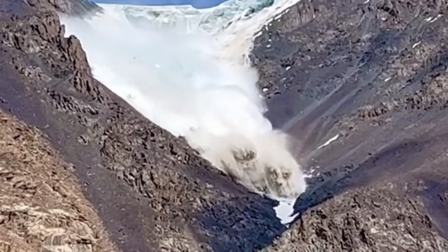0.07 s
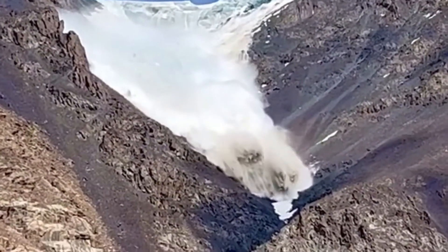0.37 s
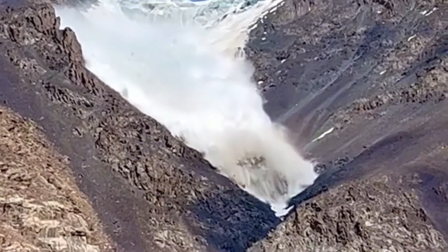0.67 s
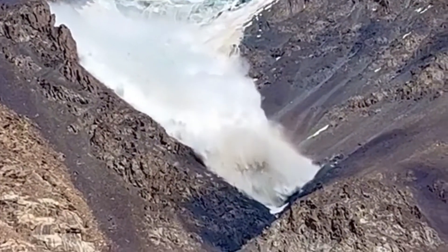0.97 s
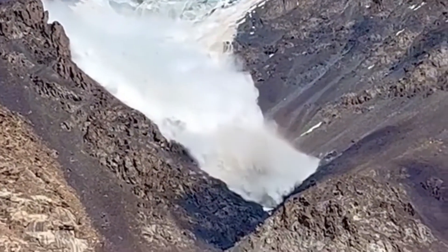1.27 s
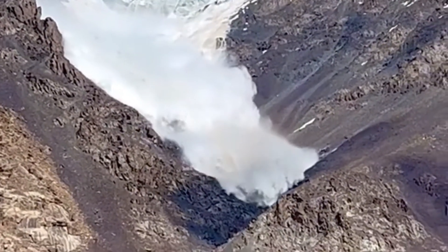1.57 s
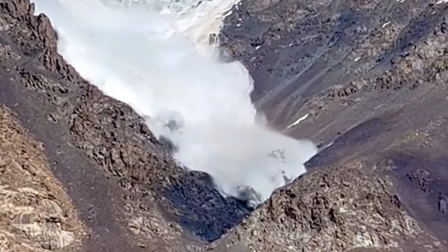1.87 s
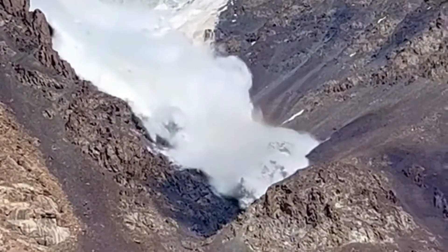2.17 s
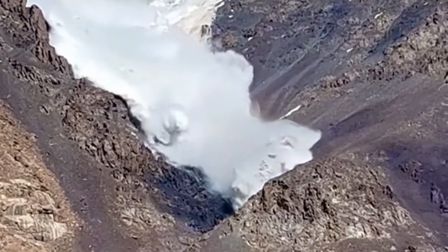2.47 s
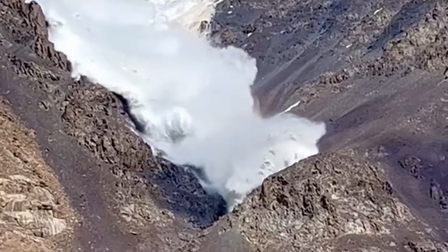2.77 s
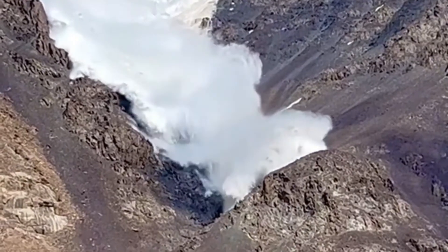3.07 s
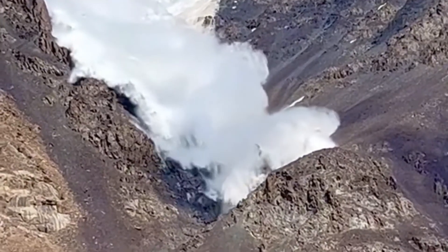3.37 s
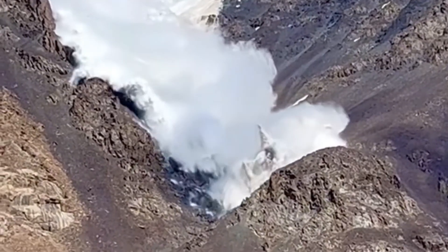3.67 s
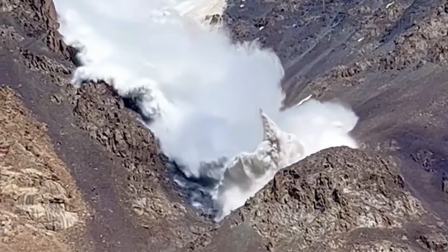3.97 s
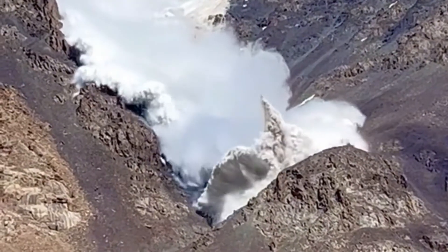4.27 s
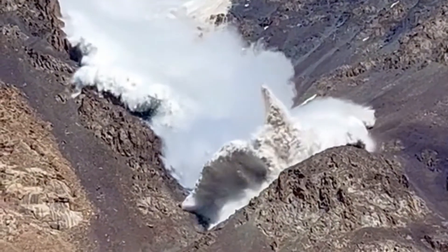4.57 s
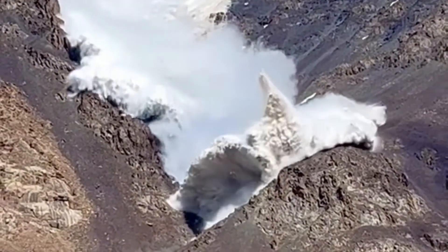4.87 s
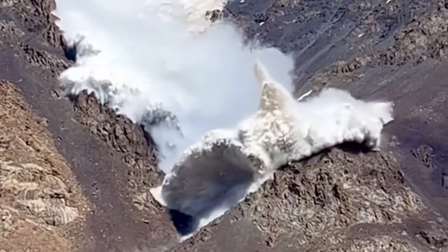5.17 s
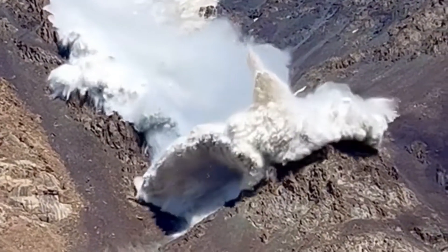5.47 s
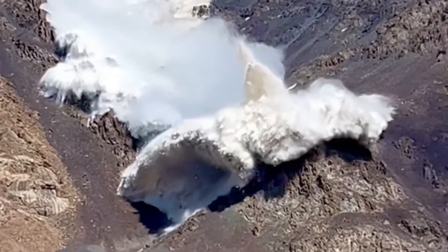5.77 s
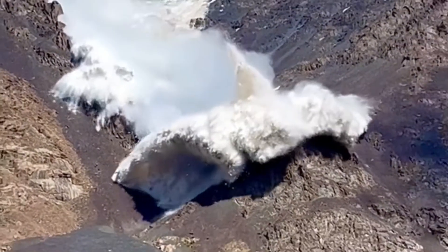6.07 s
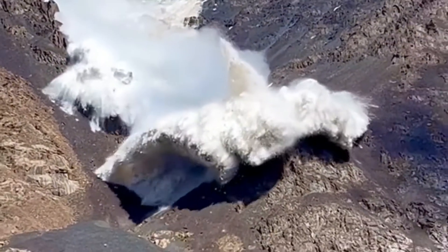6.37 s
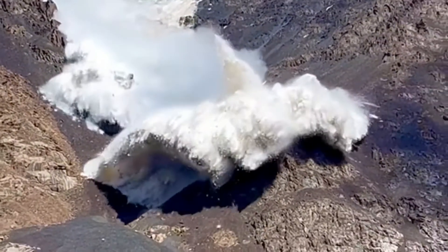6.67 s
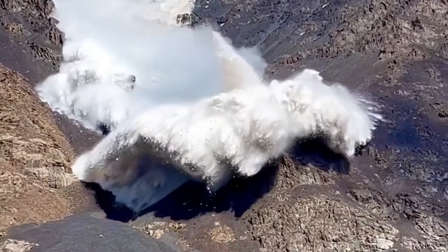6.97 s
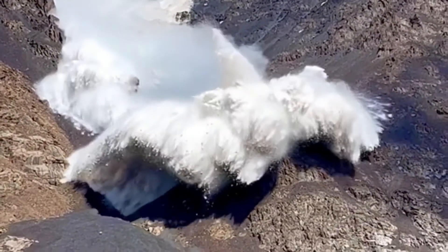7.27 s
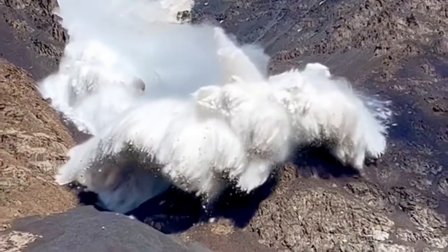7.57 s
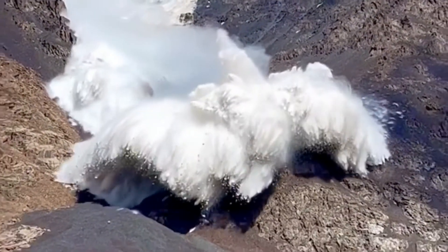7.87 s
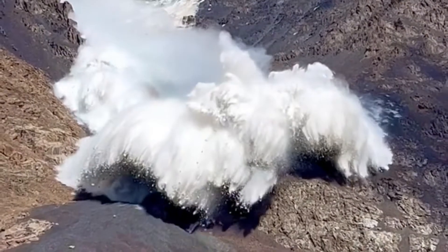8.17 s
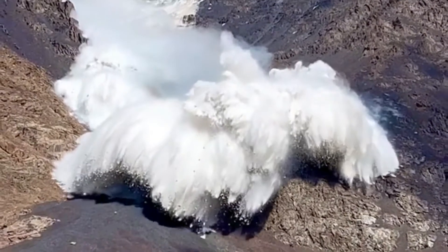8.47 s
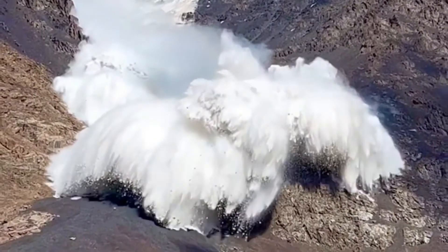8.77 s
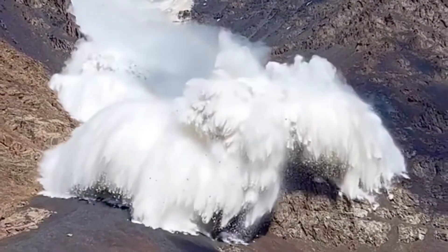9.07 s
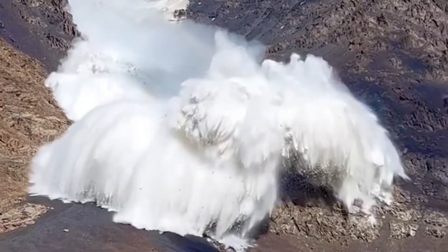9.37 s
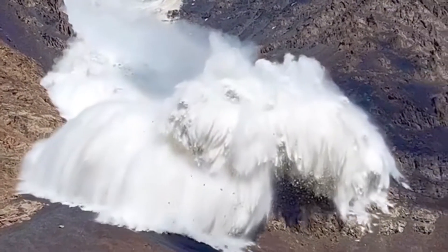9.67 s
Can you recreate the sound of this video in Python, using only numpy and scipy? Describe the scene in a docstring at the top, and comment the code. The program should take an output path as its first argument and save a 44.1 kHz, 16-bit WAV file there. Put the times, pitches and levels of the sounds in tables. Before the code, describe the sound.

A distant avalanche gives a dull roar and deep, swelling rumble with muffled knocks of ice, while wind gusts thump the microphone.

```python
"""In a mountain valley, a large avalanche pours down a rocky gully on the far side.
The churning snow gives a dull roar over a deep, surging rumble. Both swell as the front bursts
out of the gully, and blocks of ice land with dull knocks and booms. Gusts of wind flutter and
thump on the microphone. Close by there are a gritty rustle, two faint ticks and brief swishes.
A faint hiss lies under it all, and a narrow band of high hiss comes in once, briefly."""
import sys
import numpy as np
from scipy import signal
from scipy.fft import rfft, irfft, next_fast_len
from scipy.io import wavfile
from scipy.ndimage import uniform_filter1d

SR = 44100
rng = np.random.default_rng(int(sys.argv[2]) if len(sys.argv) > 2 else 0)


def log_audio(samples):
    """Write samples as a 16-bit WAV file to the path given in sys.argv[1]."""
    # one column per channel
    frames = np.atleast_2d(samples).T
    # limit to full scale, then quantise
    limited = np.clip(frames, -1, 1)
    pcm = np.round(limited * 32767).astype(np.int16)
    wavfile.write(sys.argv[1], SR, pcm)


N = 437913
TIME = np.arange(N) / SR
SIZE = next_fast_len(N, real=True)
HZ = np.maximum(np.arange(SIZE // 2 + 1) * SR / SIZE, 1)   # the frequencies of a spectrum
SIDES = np.array([[1], [-1]])   # left, right


# How hard the snow is flowing, as a boost in loudness: t/s, level/dB
FLOW_STRENGTH = [(0, 1), (2.2, 1), (3.4, 1.8), (4.2, 4), (4.95, 7), (5.8, 6), (6.5, 4), (7.1, 5.5),
                 (7.6, 4.5), (8.7, 7), (9.65, 8.5), (9.93, 8)]
# The tone of the roar, from low to high: f/Hz, level/dB
ROAR_TONE = [(110, -28), (180, 2), (242, -5), (475, -8.5), (711, -11), (869, -15.5), (1000, -15.5),
             (1920, -30.5), (2520, -39), (3050, -45.5), (3960, -75.5), (6710, -120)]

def roar(low_hz=250, split_hz=1600, roar_db=-46, lumpy_db=0.97, rush_db=-64, rush_follows=0.019):
    """Countless collisions blur into a lumpy roar; above it lies a dull, nearly steady rush."""
    flow_db, = in_time(FLOW_STRENGTH)
    tone = colour(ROAR_TONE)
    body = from_db(roar_db + flow_db + lumpy_db * drift(14)) * far_noise(tone * band(low_hz, split_hz))
    rush_level = from_db(rush_db + rush_follows * flow_db + .5 * drift(25))
    return body + rush_level * far_noise(tone * band(split_hz, 4900))


# How loud the deepest rumble is: t/s, level/dB
DEEP_LEVEL = [(0, -44.5), (0.6, -39), (1.2, -41.5), (1.9, -47), (2.4, -41.5), (3.3, -43.5), (3.9, -42),
              (4.7, -37), (5.4, -37.5), (6.0, -40.5), (6.5, -38), (7.2, -35), (7.6, -40), (8.2, -35.5),
              (8.9, -36), (9.4, -35.5), (9.93, -42)]
# The tones of the whole moving mass and of its tumbling blocks: f/Hz, level/dB
DEEP_TONE = [(14, -31), (22, -14), (30, -9), (40, -2.5), (48, -1.5), (54, 2.5), (62, 0), (75, -5.5),
             (130, -4), (170, -38)]
CHURN_TONE = [(32, -31), (55, 3.5), (80, -.5), (115, -4.5), (160, -7), (230, -10), (400, -16), (520, -42.5),
              (880, -120)]

def rumble(split_hz=75, top_hz=250, churn_db=-45, follows=0.82, surge_db=0.8, nearing_db_per_s=0.5275):
    """The mass of snow shakes the air lowest of all; tumbling blocks churn just above it."""
    deep_db, = in_time(DEEP_LEVEL)
    flow_db, = in_time(FLOW_STRENGTH)
    nearing_db = nearing_db_per_s * TIME   # the churn grows as the front draws nearer
    churn_level = from_db(churn_db + follows * flow_db + nearing_db + surge_db * drift(25))
    deep = steadied(far_noise(colour(DEEP_TONE) * band(31, split_hz)), span_s=0.3, share=0.3)
    churn = steadied(far_noise(colour(CHURN_TONE) * band(split_hz, top_hz)), span_s=0.14, share=0.29)
    return from_db(deep_db) * deep + churn_level * churn


def knocks(per_s=9, knock_db=-55, follows=0.84, size_db=3, length_s=.014, low_hz=90, high_hz=560):
    """Larger blocks of ice land at random, each with a dull knock that distance smears."""
    flow_db, = in_time(FLOW_STRENGTH)
    sizes = from_db(size_db * np.minimum(rng.exponential(1, N), 2))
    hits = sizes * (rng.random(N) < per_s / SR)
    age = TIME[:SR // 4] / length_s
    envelope = rms_one(signal.fftconvolve(hits, age * np.exp(-age))[:N])
    noise = far_noise(colour(ROAR_TONE) * band(low_hz, high_hz, order=4))
    return from_db(knock_db + follows * flow_db) * envelope * noise


# The biggest blocks of ice landing: t/s, level/dB, f/Hz, fade time/s
BIG_BLOCKS = [(2.821, -42, 420, .02), (4.886, -32, 225, 0.042), (4.935, -37, 340, 0.039),
              (4.975, -37, 486, 0.02), (5.105, -34, 199, 0.014), (5.109, -38, 460, 0.054),
              (5.193, -36, 199, 0.054), (5.29, -36, 191, 0.043), (5.718, -39.5, 304, 0.013),
              (5.981, -33, 190, 0.018), (6.302, -37, 428, 0.016), (6.478, -29, 158, 0.01),
              (7.43, -31, 298, 0.0077), (7.911, -37, 214, 0.012), (8.38, -40.5, 304, 0.012),
              (9.036, -33, 272, 0.02), (9.278, -38, 200, 0.014), (9.42, -43, 496, 0.055),
              (9.579, -34, 295, 0.022), (9.672, -35, 300, 0.0095), (9.715, -36.5, 473, 0.06),
              (9.871, -41, 470, 0.074)]

def booms(band_ratio=1.12, attack_s=0.0028, air_cutoff_hz=1100):
    """Each big block lands with a boom, lower for a heavier one, that dies away among the slopes."""
    out = np.zeros((2, N))
    age = TIME[:SR // 3]
    for s, db, hz, fade_s in BIG_BLOCKS:
        around_pitch = signal.butter(2, [hz / band_ratio, hz * band_ratio], "band", fs=SR, output="sos")
        noise = signal.sosfilt(around_pitch, rng.standard_normal(len(age)))
        envelope = (1 - np.exp(-age / attack_s)) * np.exp(-age / fade_s)
        noise /= np.sqrt(np.average(noise ** 2, weights=envelope ** 2))
        boom = from_db(db) * noise * envelope / envelope.max()
        at = round(s * SR)
        out[:, at:at + len(boom)] += boom[:N - at]
    return muffled(out, air_cutoff_hz, order=6)


# Gusts of wind, each timed from when it reaches full strength: t/s, hold/s, level/dB
WIND_GUSTS = [(0.0, 0.58, -40), (2.1, 0.88, -53.5), (3.35, 0.18, -48.5), (3.62, 0.037, -49.5),
              (4.1, 0.28, -40), (4.48, 0.24, -41), (5.08, 0.044, -42), (5.28, 1.55, -39),
              (7.0, 0.022, -37.5), (7.32, 0.11, -44), (8.5, .35, -59), (8.98, 0.26, -42.5),
              (9.3, 0.71, -35.5)]

def gust_level(rise_db_per_s=96.5, fall_db_per_s=87.5, breeze_db=-71.5):
    """How strong the wind is, in dB: the strongest gust of the moment, or else a light breeze."""
    gusts = [db + held_db(s, hold_s, rise_db_per_s, fall_db_per_s) for s, hold_s, db in WIND_GUSTS]
    return np.maximum(breeze_db, np.max(gusts, axis=0))


# The tone of wind on the microphone: f/Hz, level/dB
WIND_TONE = [(12, -44), (20, -15), (59, 1), (177, 1.5), (290, -7.5), (363, -8.5), (491, -11), (634, -15),
             (792, -18), (900, -24), (1170, -52), (1980, -120)]

def wind(split_hz=330, strong_db=-37, bright_db=0.5, flutter_db=0.5, trim_db=-1, facing_db=1.5):
    """Swirls of air push the microphone's two openings opposite ways; the right one faces the wind."""
    level_db = gust_level() + trim_db + flutter_db * drift(23)
    swirls = white_spectrum() * colour(WIND_TONE)
    large = to_sound(swirls * band(13, split_hz))
    small = to_sound(swirls * band(split_hz, 750))
    # Stronger gusts shed more small swirls, so they sound brighter.
    small_db = bright_db + 0.44 * np.minimum(level_db - strong_db, 3)
    openings = SIDES * from_db(-facing_db * SIDES)
    return from_db(level_db) * (large + from_db(small_db) * small) / np.std(large) * openings


def wind_rumble(shared_db=-9, low_hz=60, top_hz=170):
    """The largest swirls of each gust reach both openings alike."""
    swirls = white_spectrum() * colour(WIND_TONE) * band(low_hz, top_hz, order=3)
    return from_db(gust_level() + shared_db) * rms_one(to_sound(swirls))


# Thumps of wind: t/s, thump level/dB, thump f/Hz, puff level/dB, spread in time/s
THUMPS = [(0.04, -35, 151, -37, 0.015), (0.109, -35, 120, -44, 0.019), (0.209, -30, 80.6, -38.5, 0.015),
          (0.336, -28.5, 61.6, -41.5, 0.019), (0.396, -27.5, 93, -41, 0.013), (0.5, -35, 70, -35, 0.013),
          (0.594, -30.5, 58, -44, 0.024), (1.63, -35, 53.3, -54, 0.045), (2.041, -36, 117, -44, 0.011),
          (2.309, -35, 61, -49, 0.011), (4.009, -25, 57, -38, 0.011), (4.288, -26, 60, -36, 0.023),
          (4.34, -30, 72, -35.5, 0.012), (5.298, -29, 56, -40, 0.015), (5.421, -26.5, 52, -44, 0.014),
          (5.564, -23.5, 59.6, -44.5, 0.012), (6.627, -23, 54, -31, 0.014), (7.108, -26.5, 80, -40, 0.0054),
          (7.139, -25, 70, -52, 0.0077), (7.196, -20, 58, -38.5, 0.0072), (7.269, -24.5, 85.4, -37, 0.0059),
          (7.312, -24.5, 97, -43, 0.0099), (7.358, -23, 61.7, -42, 0.01), (7.371, -18.5, 114, -38, 0.0074),
          (7.405, -26, 62, -39, 0.015), (7.447, -13, 50, -25.5, 0.017), (7.638, -27.5, 52, -44, 0.027),
          (8.078, -25.5, 82, -40, 0.011), (8.511, -23, 70, -46, 0.0066), (8.674, -24, 54, -38, 0.013),
          (8.771, -18.5, 68.5, -34, 0.0062), (8.826, -24, 70.7, -35, 0.0062),
          (8.918, -23, 79, -40.5, 0.014), (8.988, -26, 62, -48, 0.016), (9.2, -26, 82, -44, 0.024),
          (9.406, -22.5, 110, -37, 0.0064), (9.478, -29, 134, -43.5, 0.01), (9.555, -27, 96, -42.5, 0.013),
          (9.621, -21, 109, -41, 0.0058), (9.699, -22, 96, -38, 0.0086)]

def wind_thumps(puff_low_hz=80, puff_high_hz=210):
    """A big swirl covers both openings at once: a few slow waves of pressure and a dull puff."""
    puff = steadied(far_noise(band(puff_low_hz, puff_high_hz, order=3)), span_s=0.0058, share=0.47)
    out = np.zeros((2, N))
    for s, thump_db, hz, puff_db, spread_s in THUMPS:
        suction = -from_db(thump_db) * np.cos(2 * np.pi * hz * (TIME - s))
        out += swell(s, spread_s) * (suction + from_db(puff_db) * puff)
    return out


# How loud the gritty rustle is: t/s, level/dB
GRIT_LEVEL = [(0, -88), (0.7, -91), (2.9, -89), (3.5, -88), (5.0, -83.5), (5.7, -88), (7.15, -88.5),
              (7.7, -91.5), (8.5, -87.5), (9.1, -94.5), (9.93, -96)]

def grit(per_s=1500, size_db=2.5, ring_cycles=45, low_hz=2700, high_hz=4100, db_per_octave=-16):
    """A stream of tiny grains makes a faint rustle, each ringing briefly at one of many pitches."""
    level_db, = in_time(GRIT_LEVEL)
    hits = rng.random(N) < per_s / SR
    sizes = from_db(size_db * np.minimum(rng.exponential(1, N), 3))
    grains = hits * sizes * rng.choice([-1, 1], N)
    pitches = np.geomspace(low_hz, high_hz, 24)
    chosen_pitch = rng.integers(0, len(pitches), N)
    out = np.zeros(N)
    for k, hz in enumerate(pitches):
        fade, turn = from_db(-60 * hz / (ring_cycles * SR)), 2 * np.pi * hz / SR   # per sample
        ringer = [np.sin(turn), 0, -np.sin(turn)], [1, -2 * fade * np.cos(turn), fade ** 2]
        ring = signal.lfilter(*ringer, grains * (chosen_pitch == k) + 1e-18)
        out += from_db(db_per_octave * np.log2(hz / low_hz)) * ring
    return from_db(level_db) * rms_one(muffled(out, high_hz, order=8))


# Small taps nearby: t/s, ring level/dB, treble limit f/Hz, scuff level/dB
TAPS = [(2.239, -48.5, 3600, -71), (8.492, -56, 3500, -76)]
# The notes that ring in each tap: f/Hz, level/dB, time to die away/s
TAP_NOTES = [(1260, -2, .02), (1600, 4.5, 0.029), (1860, 3, .014), (2540, -5, 0.01), (3000, -14, 0.028),
             (3770, -11, .016)]

def ticks(scuff_s=.009, scuff_low_hz=1400, scuff_high_hz=3900, rough_db=3):
    """Small, blunt taps ring for an instant inside a rough scuff; a softer touch sounds duller."""
    age = TIME[:SR // 20]
    ring = sum(from_db(db - 60 * age / fade_s) * np.sin(2 * np.pi * hz * age)
               for hz, db, fade_s in TAP_NOTES)
    roughness = from_db(rough_db * drift(130))
    scuff = rms_one(roughness * to_sound(white_spectrum() * band(scuff_low_hz, scuff_high_hz, order=12)))
    out = np.zeros(N)
    for s, db, top_hz, scuff_db in TAPS:
        at = round(s * SR)
        out[at:at + len(ring)] += from_db(db) * muffled(ring, top_hz, order=12)
        out += from_db(scuff_db) * swell(s, scuff_s) * scuff
    return out


# Swishes nearby, each timed from when it reaches full strength: t/s, level/dB, hold/s
SWISH_STROKES = [(7.364, -79.5, 0.001), (9.143, -62, 0.027), (9.19, -80, 0.028), (9.294, -84, .012)]
# The tone of a swish: f/Hz, level/dB
SWISH_TONE = [(1800, -16), (3300, 4), (4500, -1), (5700, -6.5), (7000, -3), (8200, -11), (9000, -25),
              (12000, -48)]

def swishes(rough_db=1.5, rise_db_per_s=1098, fall_db_per_s=852):
    """Short, rasping swishes close by: each catches quickly, slides and lets go."""
    strokes = [db + held_db(s, hold_s, rise_db_per_s, fall_db_per_s) for s, db, hold_s in SWISH_STROKES]
    level_db = np.maximum(np.max(strokes, axis=0), -200) + rough_db * drift(200)
    return from_db(level_db) * wide_noise(colour(SWISH_TONE), width=.7)


def narrow_hiss(at_s=8.165, hold_s=.155, hz=5020, spread_hz=120, level_db=-91):
    """A very faint, narrow band of high hiss near 5 kHz comes in, holds briefly and stops."""
    noise = wide_noise(band(hz - spread_hz, hz + spread_hz, order=40), width=0.64)
    return from_db(level_db + held_db(at_s, hold_s, rise_db_per_s=300, fall_db_per_s=800)) * noise


# The tone of the background hiss: f/Hz, level/dB
HISS_TONE = [(2500, 3), (4000, 0), (5500, -8), (8000, -5), (11000, -6), (14000, -16)]

def hiss(level_db=-87):
    """A faint, steady hiss lies under everything."""
    return from_db(level_db) * wide_noise(colour(HISS_TONE), width=0.93)


# How far-off sound reaches the two sides: f/Hz, likeness/0-1, left minus right/dB, left lead/radians
FAR_STEREO = [(100, 0.999, -0.1, 0), (170, 0.99, -0.7, 0.05), (250, 0.97, -1.0, 0.2),
              (320, 0.96, -1.0, 0.12), (460, 0.9, -1.5, 0.05), (570, 0.81, -1.9, 0.17),
              (680, 0.86, 1.2, 0.54), (820, 0.72, 4.6, 0.15), (930, 0.8, 2.6, 0.35),
              (1050, 0.72, 3.8, 0.25), (1220, 0.42, 4.2, 0.35), (1430, 0.16, 4.4, 0.4),
              (1580, 0.35, 4.4, -1.2), (1750, 0.66, 3.5, -0.6), (1970, 0.81, 2.0, 0.05),
              (2240, 0.72, 0.5, 1.39), (2560, 0.7, -0.8, 2.6), (3090, 0.7, 0, 1.4)]

def far_noise(gain):
    """Noise from up the valley: the slopes scatter it, so left and right are only partly alike."""
    alike, pan_db, lead = in_pitch(FAR_STEREO)
    shared, different = white_spectrum(), white_spectrum()
    pair = np.sqrt(1 + alike) * shared + np.sqrt(1 - alike) * different * SIDES
    direction = from_db(SIDES * pan_db / 2) * np.exp(.5j * SIDES * lead)
    pair = to_sound(gain * pair * direction)
    return pair / np.std(pair.mean(axis=0))


def wide_noise(gain, width, narrow_hz=5800, top_width=.2):
    """Noise spread between left and right, narrower in the high treble."""
    spread = top_width + (width - top_width) * band(20, narrow_hz)
    shared = to_sound(white_spectrum() * gain)
    different = to_sound(white_spectrum() * gain * spread)
    return (shared + different * SIDES) / np.std(shared)


def steadied(pair, span_s, share):
    """Partly even out the chance swells in a noise that last longer than the span."""
    power = uniform_filter1d(pair.mean(axis=0) ** 2, int(span_s * SR))
    power = uniform_filter1d(power, int(span_s * SR / 2))
    pair = pair / (power + 1e-9) ** (share / 2)
    return pair / np.std(pair.mean(axis=0))


def from_db(db):
    """Turn decibels into a gain, the number to multiply a sound by."""
    return 10 ** (np.asarray(db) / 20)


def rms_one(x):
    """Scale a sound to an average power of 1."""
    return x / np.sqrt(np.mean(x ** 2) + 1e-20)


def white_spectrum():
    """The spectrum of fresh noise, about equally strong at every frequency."""
    return rfft(rng.standard_normal(SIZE))


def to_sound(spectrum):
    """Turn a spectrum into N samples."""
    return irfft(spectrum, SIZE)[..., :N]


def in_time(rows):
    """Join a table's points to get each column at every sample."""
    s, *columns = np.transpose(rows)
    return [np.interp(TIME, s, c) for c in columns]


def in_pitch(rows):
    """Join a table's points to get each column at every frequency."""
    hz, *columns = np.transpose(rows)
    return [np.interp(np.log(HZ), np.log(hz), c) for c in columns]


def colour(rows):
    """The gains of a tone table, falling away beyond its ends."""
    return from_db(in_pitch(rows)[0]) * band(rows[0][0] / 2, rows[-1][0] * 2)


def band(low_hz, high_hz, order=6):
    """Gains that keep what lies between two frequencies; a higher order gives steeper edges."""
    return ((1 + (low_hz / HZ) ** (2 * order)) * (1 + (HZ / high_hz) ** (2 * order))) ** -.5


def muffled(x, top_hz, order):
    """Cut the treble above a frequency."""
    return signal.sosfilt(signal.butter(order, top_hz, fs=SR, output="sos"), x)


def drift(rate_hz):
    """A random wobble of about 1 either way, mostly slower than the rate."""
    return rms_one(to_sound(white_spectrum() / (1 + (HZ / rate_hz) ** 2)))


def swell(s, spread_s):
    """A smooth rise and fall around a moment."""
    return np.exp(-.5 * ((TIME - s) / spread_s) ** 2)


def held_db(s, hold_s, rise_db_per_s, fall_db_per_s):
    """A level in dB that rises to full strength at a moment, holds, then dies away."""
    return -rise_db_per_s * np.maximum(s - TIME, 0) - fall_db_per_s * np.maximum(TIME - s - hold_s, 0)


def scene():
    """The avalanche, the wind on the microphone, the small sounds and a faint hiss."""
    avalanche = roar() + rumble() + knocks() + booms()
    gusts = wind() + wind_rumble() + wind_thumps()
    return avalanche + gusts + grit() + ticks() + swishes() + narrow_hiss() + hiss()


def record(dry, fade_s=.004, cutoff_hz=14500):
    """Fade both ends quickly and cut the highest treble."""
    from_end_s = np.minimum(TIME, TIME[::-1])
    fade = np.sin(np.pi / 2 * np.clip(from_end_s / fade_s, 0, 1)) ** 2
    return signal.sosfilt(signal.cheby2(12, 70, cutoff_hz, fs=SR, output="sos"), dry * fade)


dry = scene()
out = record(dry)
log_audio(out)
```